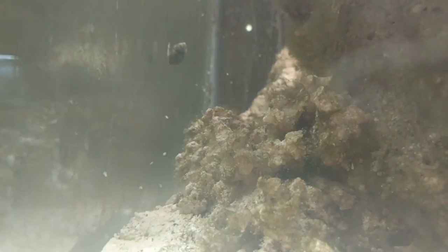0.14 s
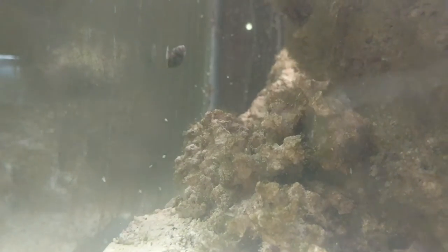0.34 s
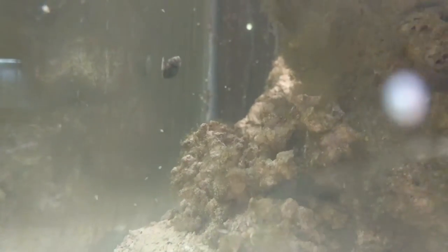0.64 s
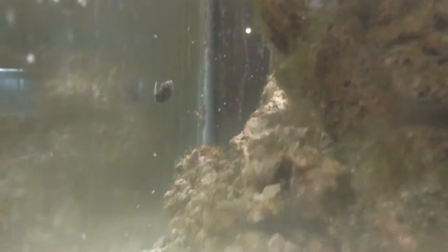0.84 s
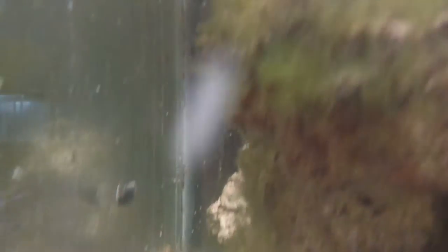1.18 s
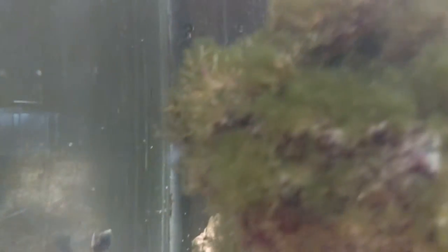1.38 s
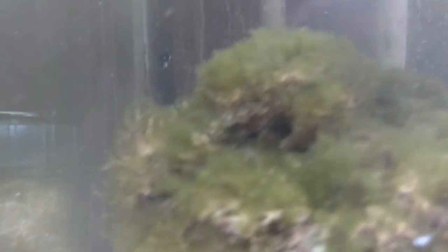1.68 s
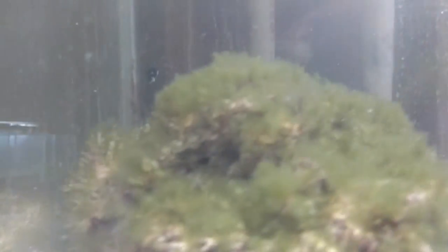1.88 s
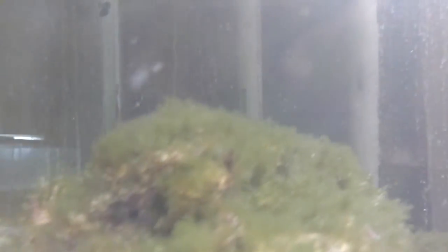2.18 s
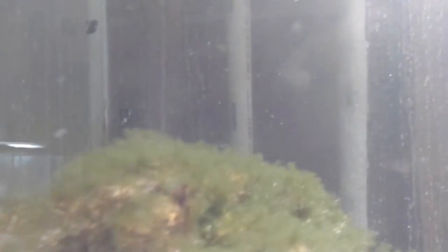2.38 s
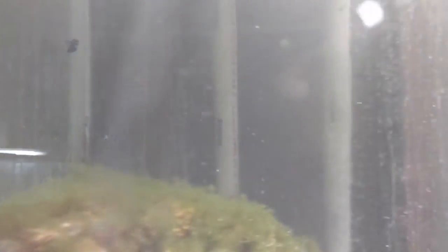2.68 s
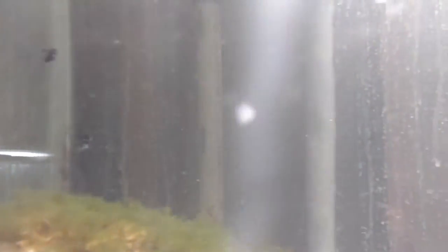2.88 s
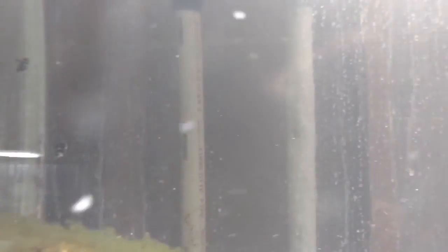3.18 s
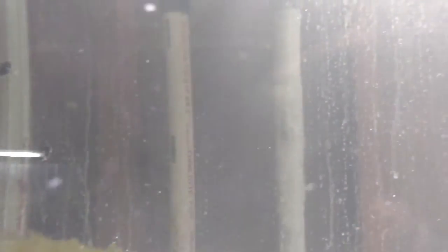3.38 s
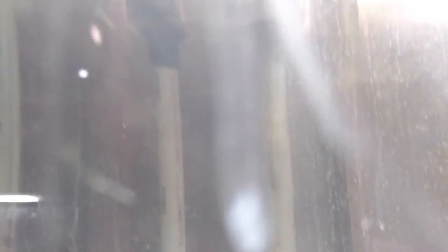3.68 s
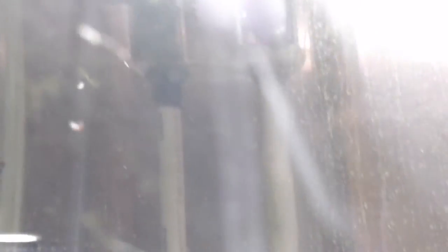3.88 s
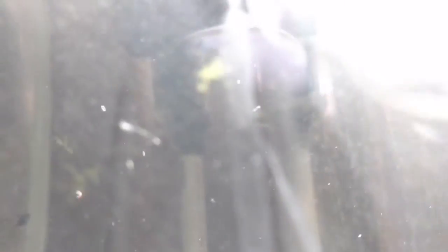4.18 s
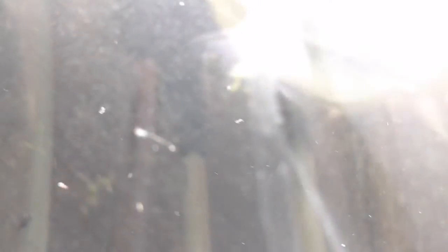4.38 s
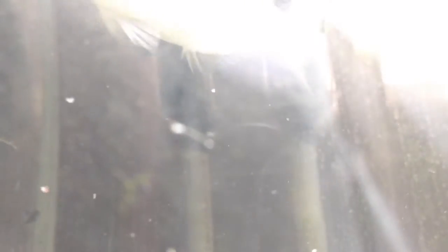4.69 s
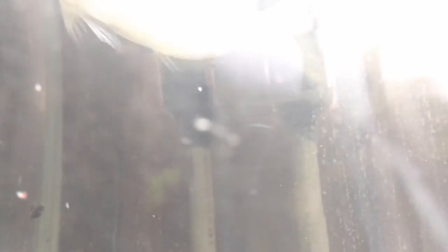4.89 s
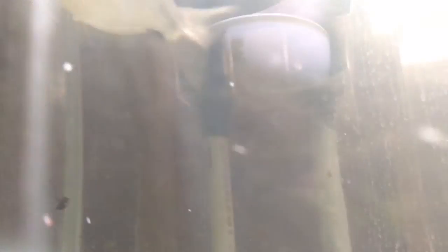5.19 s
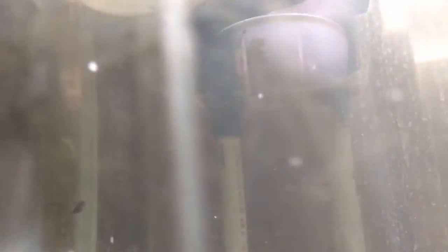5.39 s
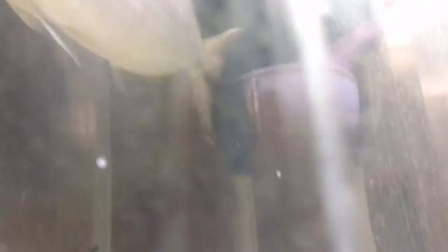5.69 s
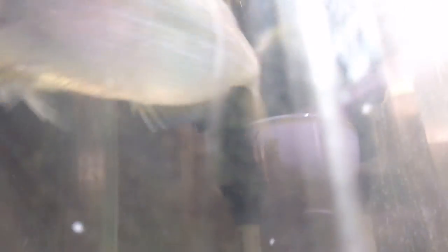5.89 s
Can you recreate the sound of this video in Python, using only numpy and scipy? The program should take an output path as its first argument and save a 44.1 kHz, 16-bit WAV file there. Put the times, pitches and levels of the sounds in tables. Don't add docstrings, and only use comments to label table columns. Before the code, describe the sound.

Water trickles, plinks and gurgles in a home aquarium, mostly to the right of a wide stereo image. A single loud glassy tap with a fast rattle of bounces comes early. Afterwards the microphone drifts up to the pump: its deep mains-like hum grows from almost nothing to dominant, overtones swelling and fading, the return pipe throbbing and whistling, the water thinning behind it.

```python
import sys
import numpy as np
from scipy import signal
from scipy.fft import rfft, irfft, next_fast_len
from scipy.io import wavfile
from scipy.ndimage import uniform_filter1d

SR = 44100
rng = np.random.default_rng(int(sys.argv[2]) if len(sys.argv) > 2 else 0)


def waveform_to_disk(signal):
    frames = np.transpose(np.atleast_2d(signal))
    scaled = np.clip(frames, -1, 1) * 32767
    samples = np.round(scaled).astype(np.int16)
    wavfile.write(sys.argv[1], SR, samples)


N = 266802

HUM_HZ = 120.0
# (time [s], level [dB])
HUM_APPROACH = [(0.0, -54), (0.9, -54.5), (1.25, -59.5), (1.5, -48.5), (1.8, -39.5), (2.1, -37),
                (2.4, -32.5), (2.7, -28.5), (3.0, -25.5), (3.17, -22.5), (3.3, -23.5), (3.45, -22),
                (3.7, -23), (4.1, -21), (4.35, -23.5), (4.5, -22), (5.1, -22), (6.05, -22)]
MULTIPLES = (2, 3, 4, 5, 6, 7, 8, 10, 11, 12, 15)
# (time [s], length [s], level [dB])
ROOM_SWELLS = [
    [(3.74, 0.68, -45), (4.7, .5, -44.5), (5.6, 1.6, -45)],
    [(0.43, 1.5, -48.5), (2.47, 1.04, -41.5), (3.46, 0.43, -44.5), (4.32, 0.66, -42), (4.85, 0.79, -45),
     (5.63, 1.8, -46)],
    [(1.5, 0.4, -50), (2.09, 0.43, -44.5), (2.91, 0.76, -46), (3.55, 0.46, -39.5), (3.85, .3, -42.5),
     (4.2, 0.42, -37.5), (5.06, 3.3, -42)],
    [(2.455, 0.7, -48), (3.3, 0.57, -47), (3.9, 1, -41), (5.26, 3.6, -44)],
]
# (time [s], length [s], level [dB])
CABINET_SWELLS = [
    [(1, 0.6, -65), (1.6, 0.8, -49), (2.1, 0.26, -44), (3, 0.4, -51), (4.5, 0.3, -49), (4.9, 0.7, -53)],
    [(0.15, 0.57, -47.5), (0.8, 0.62, -49), (5, 2, -52)],
    [(0.0, 0.8, -55), (1.5, 0.35, -56), (3, 0.32, -51), (5.7, 1.0, -53.5)],
    [(0.5, 1.7, -56), (3.5, 0.3, -57), (3.9, 0.35, -48.5), (4.2, 0.42, -46), (6, 1.5, -62)],
    [(0.4, 1, -56), (3.85, 0.27, -54), (4.3, 0.41, -54.5), (3.5, 0.6, -52), (5.5, 0.5, -59)],
    [(3.4, 0.79, -56), (3.9, 0.46, -56), (4.3, 0.61, -57)],
    [(3.85, 0.74, -54), (4.9, 0.8, -60)],
]
FOLLOWERS = ((9, 10), (13, 11))
FOLLOWER_DB, BETWEEN_SWELLS_DB = -8.5, -41

# (start [s], length [s], 2nd overtone level [dB], whistle level [dB], whistle pitch [Hz])
PIPE_THROBS = [(2.01, 0.19, -32, -44.5, 835), (2.26, 0.034, -40, -54, 840), (2.39, 0.065, -42, -60, 830),
               (2.497, .07, -43, -62, 800), (2.655, 0.13, -36.5, -39, 835), (2.87, 0.093, -35, -37, 840),
               (3.031, .11, -37.5, -40.5, 825), (3.154, 0.038, -55, -39.5, 880),
               (3.193, 0.053, -35, -38, 790), (3.312, .06, -41, -40.5, 850), (3.45, 0.047, -47, -41, 820),
               (3.562, 0.17, -42.5, -45, 850), (3.81, .15, -38, -42, 855), (3.985, 0.21, -39, -39.5, 843),
               (4.26, 0.091, -46, -46, 840), (4.44, 0.041, -43.5, -50, 830)]
THROB_RISE_S, THROB_FALL_S = 0.0353, 0.04
WHISTLE_LATE_S, WHISTLE_CLIMB_HZ_PER_S = 0.0203, 59.8

# (frequency [Hz], level [dB])
WASH_COLOUR = [(25, -11.5), (60, -19.5), (130, -3), (200, -3), (400, -4), (800, -3), (1100, -7.5),
               (1600, -9.5), (2200, -16.5), (4000, -21), (9000, -32.5)]
# (frequency [Hz], level [dB])
FIZZ_COLOUR = [(1200, -25), (2500, 8), (3500, 5), (5000, 7.5), (7000, 7), (9500, 1.5), (12000, -5),
               (15000, -7.5)]
# (frequency [Hz], width [Hz], level [dB])
OVERFLOW_PIPE = (345, 9, 5.5)
# (time [s], level [dB])
SPRAY_FACING = [(0.0, -54), (0.3, -58.5), (0.7, -57), (1.0, -52), (1.2, -54), (1.45, -49.5), (2.05, -48.5),
                (2.45, -53.5), (2.73, -49.5), (3.05, -57.5), (3.42, -54), (3.65, -61.5), (4.6, -66.5),
                (4.87, -65), (4.97, -56.5), (5.65, -59.5), (5.8, -64), (6.05, -65)]
# (time [s], level [dB], length [s])
SURGES = [(0.0, 1.5, 0.085), (0.368, 3.5, 0.085), (0.635, 1.5, .12), (1.004, 1.5, 0.24), (1.63, 5, 0.2),
          (2.056, 5, .15), (2.274, 2.5, .12), (2.62, 2.5, 0.18), (2.833, 2, 0.21), (3.153, 3.5, 0.23),
          (3.397, 2, 0.16), (4.01, 4, 0.23), (4.2, 3, 0.18), (5.307, 1, 0.64), (5.68, 2, .12)]
FIZZ_DB, FIZZ_SHARE, FIZZ_FADE_DB_PER_S = -47.5, 0.29, 0.88
WASH_FAR_DB, WASH_NEAR_DB, WASH_SHARE = -45, -43.5, 0.28
RUMBLE_HZ, RUMBLE_FAR_DB = 161, -7

# (time [s], pitch [Hz], level [dB], length [cycles])
CLEAR_DRIPS = [(.005, 5020, -34, 90), (.01, 3960, -50, 240), (.07, 3500, -48, 80), (.125, 4800, -33, 140),
               (.195, 4050, -43, 100), (.275, 4670, -37, 130), (0.321, 6300, -29, 100),
               (.62, 4280, -40, 70), (.75, 5600, -48, 150), (.83, 3260, -37, 66), (.96, 3390, -41, 120),
               (1.01, 2700, -53, 120), (0.069, 327, -44, 26), (0.279, 343, -31.5, 28),
               (0.549, 323, -35, 25), (1.52, 366, -36, 25), (3.17, 317.5, -29, 31), (3.22, 677, -34, 46),
               (5.19, 3630, -53, 37)]
# (time [s], peak level [dB], colour [Hz], top end [dB])
SPLASHES = [(0.047, -36, 9000, -15), (.235, -43, 9500, -6), (0.286, -39, 9000, -12),
            (0.468, -35, 7300, -12), (0.599, -33.5, 9000, -3), (.65, -42, 13000, 0), (.78, -41, 12000, 0),
            (1.035, -36, 9000, -12), (1.375, -35, 7000, -12), (1.555, -38, 9000, -16),
            (3.966, -43, 6000, -32)]

# (time [s], level [dB])
TAP_BLOWS = [
    (1.0736, -18),
    (1.075, -6.5),
    (1.0816, -16),
    (1.0873, -13.5),
    (1.0964, -17.5),
    (1.1043, -21),
]
# (frequency [Hz], level [dB], decay by 60 dB [s])
GLASS_MODES = [(344, -0.5, 0.23), (509, 1, .12), (608, -10, 0.11), (1240, -23, .08), (1610, 3, 0.056),
               (3040, -5, 0.082), (3210, 4.5, 0.19), (3040, 2, 0.086), (5100, -10, .1), (6000, 6.5, 0.072),
               (5800, 1, 0.12), (7000, -15, .05), (9200, 5, 0.062)]
# (frequency [Hz], level [dB])
CRACK_COLOUR = [(150, -16), (500, -11), (1000, 2.5), (1600, -3.5), (2200, -8), (3100, -3.5), (3900, -6),
                (4800, -5), (6000, -1.5), (9000, -2.5), (10500, -15), (15000, -10.5)]

# (frequency [Hz], level at the start [dB], level at the end [dB])
FAR_MOTOR = [(248.6, -45, -55), (535, -54, -61), (784, -55, -60.5), (1132, -56, -64)]

# (frequency [Hz], level [dB])
PORTS_APART = [(30, -29.5), (100, -6), (250, -5), (500, -3), (850, 0), (1200, 0.5), (15000, -0.5)]
# (frequency [Hz], level [dB])
BODY_SHADE = [(1000, 2), (3000, -3.5), (4500, -6), (7000, -7.5), (15000, -7)]
# (frequency [Hz], width [Hz], level [dB])
WEAK_BANDS = [
    [(2330, 500, -11.0)],
    [(1070, 160, -3.0), (3520, 300, -4.0)],
]
EDGE_HZ = 15500


def gain_of(db):
    return 10 ** (np.asarray(db) / 20)


def evened(x):
    return x / np.sqrt(np.mean(abs(x) ** 2) + 1e-20)


def read(points, hz):
    f, value = np.transpose(points)
    return np.interp(np.log(hz + 1), np.log(f + 1), value)


def level_at(rows, t):
    s, db = np.transpose(rows)
    return np.interp(t, s, db)


def bump(t, s, length):
    return np.exp(-(2 * (t - s) / length) ** 2)


def coloured(x, points):
    size = x.shape[-1]
    gain = gain_of(read(points, np.fft.rfftfreq(size, 1 / SR)))
    return irfft(rfft(x) * gain, size)


def tone(turns, hz, db, lag_s, waver, per_s=15.0):
    steps = rng.standard_normal(600)[:round(per_s * N / SR) + 2]
    drift = 1 + waver * np.interp(np.arange(N) / SR * per_s, np.arange(len(steps)), steps)
    turns = turns + rng.random() - np.array([[lag_s], [0]]) * hz
    return np.sqrt(2) * gain_of(db) * drift * np.cos(2 * np.pi * turns)


def at_ports(shared, own, hz):
    apart = np.minimum(gain_of(read(PORTS_APART, hz)), 1)[:, None]
    left = np.sqrt(1 - apart ** 2) * shared + apart * own
    return np.array([left * gain_of(read(BODY_SHADE, hz))[:, None], shared])


def placed(sound, s):
    hz, _, z = signal.stft(sound, SR, nperseg=64)
    pair = signal.istft(at_ports(z[0], z[1], hz), SR, nperseg=64)[1]
    out = np.zeros((2, N + pair.shape[1]))
    out[:, round(s * SR):][:, :pair.shape[1]] = pair
    return out[:, :N]


def overtones(t, hum_db):
    rest = gain_of(2 * (hum_db + BETWEEN_SWELLS_DB))
    level = {}
    for k, swells in zip(MULTIPLES, list(ROOM_SWELLS) + list(CABINET_SWELLS)):
        power = sum(gain_of(2 * db) * bump(t, s, length) ** 2 for s, length, db in swells)
        level[k] = 10 * np.log10(rest + power)
    for k, lead in FOLLOWERS:
        level[k] = level[lead] + FOLLOWER_DB
    return level


def throbs(t):
    start, length, second_db, whistle_db, hz = np.transpose(PIPE_THROBS)[:, :, None]

    def shape(late_s):
        rise = (t - start - late_s) / THROB_RISE_S + 0.5
        fall = (start + length - t) / THROB_FALL_S + 1
        return np.clip(np.minimum(rise, fall), 0, 1) ** 2

    second = gain_of(second_db) * shape(0)
    whistle = gain_of(whistle_db) * shape(WHISTLE_LATE_S)
    pitch = hz + WHISTLE_CLIMB_HZ_PER_S * (t - start - length / 2)
    rest = 1e-6
    pitch = ((whistle * pitch).sum(0) + rest * 7 * HUM_HZ) / (whistle.sum(0) + rest)
    return second.sum(0), whistle.sum(0), pitch


def pump():
    t, slow = np.arange(N) / SR, np.arange(0, N / SR + 0.01, 0.002)
    hum_db = level_at(HUM_APPROACH, slow)
    lines = {k: np.interp(t, slow, db) for k, db in overtones(slow, hum_db).items()}
    throb, whistle, whistle_hz = [np.interp(t, slow, course) for course in throbs(slow)]
    out = tone(HUM_HZ * t, HUM_HZ, np.interp(t, slow, hum_db), lag_s=70e-6, waver=0.072, per_s=5.06)
    second = np.hypot(throb, gain_of(lines.pop(2)))
    out += second * tone(2 * HUM_HZ * t, 2 * HUM_HZ, -1.1, lag_s=45e-6, waver=0.076)
    for k, db in lines.items():
        out += tone(k * HUM_HZ * t, k * HUM_HZ, db, lag_s=30e-6, waver=0.25, per_s=20.0)
    turns = np.cumsum(whistle_hz) / SR
    return out + whistle * tone(turns, whistle_hz, 0.087, lag_s=5e-6, waver=0.39, per_s=40.0)


def flow(t):
    spray_db, hum_db = level_at(SPRAY_FACING, t), level_at(HUM_APPROACH, t)
    near = (hum_db - hum_db.min()) / np.ptp(hum_db)
    surge_db = sum(db * bump(t, s, length) for s, db, length in SURGES)
    facing_db = FIZZ_SHARE * (spray_db - spray_db.mean())
    fizz_db = FIZZ_DB + facing_db - FIZZ_FADE_DB_PER_S * t + surge_db
    wash_db = WASH_FAR_DB + (WASH_NEAR_DB - WASH_FAR_DB) * near + WASH_SHARE * surge_db
    return fizz_db, wash_db, spray_db - fizz_db, RUMBLE_FAR_DB * (1 - near)


def water():
    frames, hz = N // 256 + 5, np.fft.rfftfreq(1024, 1 / SR)[:, None]
    fizz_db, wash_db, top_db, rumble_db = flow(np.arange(frames) * 256 / SR)
    a, b, c, d, patches = rng.standard_normal((frames, 513, 5)).T
    patches = evened(uniform_filter1d(uniform_filter1d(patches, size=12, axis=0), size=6, axis=1))
    flicker = evened(uniform_filter1d(rng.standard_normal(frames), size=4))
    pipe_hz, width_hz, pipe_db = OVERFLOW_PIPE
    pipe = pipe_db / (1 + (2 * (hz - pipe_hz) / width_hz) ** 2)
    rumble = rumble_db / (1 + (hz / RUMBLE_HZ) ** 4)
    wash = gain_of(read(WASH_COLOUR, hz) + pipe + wash_db - 4.0 + rumble)
    airy = np.clip(np.log2(hz / 6000 + 1e-3), 0, 1.2)
    fizz = gain_of(read(FIZZ_COLOUR, hz) + fizz_db - 21.0 + airy * (top_db + 9.0) + 0.53 * flicker)
    z = at_ports(a + 1j * b, c + 1j * d, hz[:, 0]) * np.hypot(wash, fizz) * gain_of(1.55 * patches)
    return signal.istft(z, nperseg=1024, noverlap=768)[1][:, :N]


def air_pocket(hz, cycles):
    t = np.arange(round(cycles * SR / hz)) / SR
    turns = hz * (t * (1 + 0.014 * t / t[-1]) - np.array([[60e-6], [0]]))
    shade = gain_of([[read(BODY_SHADE, hz)], [0]])
    return np.sin(2 * np.pi * turns) * np.hanning(len(t)) * shade


def bubbles(low_hz, high_hz, per_s, level_db, cycles):
    out = np.zeros((2, N))
    for hz in np.geomspace(low_hz, high_hz, num=12):
        size = gain_of(2.6 * np.minimum(rng.exponential(1, N), 1.8))
        births = size * (rng.random(N) < per_s / 12 / SR)
        out += signal.oaconvolve(births[None], air_pocket(hz, cycles), axes=1)[:, :N]
    return gain_of(level_db) * out


def drips():
    out = np.zeros((2, N))
    for s, hz, db, cycles in CLEAR_DRIPS:
        for late, size in rng.uniform(-1, 1, (3, 2)):
            ring = gain_of(db - 5.5) * air_pocket(hz * (1 + 0.018 * size), 0.65 * cycles)
            start = round((s + (1 + late) * 0.15 * cycles / hz) * SR)
            out[:, start:][:, :ring.shape[1]] += ring
    return out


def splashes():
    t, out = np.arange(3000) / SR, np.zeros((2, N))
    for s, db, hz, top_db in SPLASHES:
        colour = [(0.36 * hz, -30), (0.5 * hz, -6), (hz, 0), (1.3 * hz, -5), (16000, top_db)]
        hiss = evened(coloured(rng.standard_normal((2, len(t))), colour))
        out += placed(gain_of(db - 60 * t / 0.17) * hiss * np.minimum(t / 0.0011, 1), s)
    return out


def tap():
    t, blows = np.arange(9000) / SR, np.zeros(9000)
    first_s = TAP_BLOWS[0][0]
    for s, db in TAP_BLOWS:
        blows[round((s - first_s) * SR)] = gain_of(db)
    ring = 0
    for hz, db, t60 in GLASS_MODES:
        ring = ring + gain_of(db - 60 * t / min(t60, 0.2)) * np.sin(2 * np.pi * hz * t)
    crack = evened(coloured(rng.standard_normal((2, len(t))), CRACK_COLOUR))
    crack = crack * (gain_of(-60 * t / 0.012) + gain_of(-10.5 - 60 * t / 0.15))
    body = gain_of(-5.5) * ring / abs(ring).max() + gain_of(-3.5) * crack
    return placed(signal.fftconvolve(blows[None], body, axes=1)[:, :len(t)], first_s)


def far_motor():
    t, out = np.arange(N) / SR, np.zeros((2, N))
    for hz, start_db, end_db in FAR_MOTOR:
        out += tone(hz * t, hz, start_db + (end_db - start_db) * t / t[-1], lag_s=90e-6, waver=0.29)
    return out


def scene():
    gurgle = bubbles(low_hz=273.0, high_hz=1496, per_s=13, level_db=-58.0, cycles=17)
    trickle = bubbles(low_hz=2605, high_hz=8170, per_s=60, level_db=-58, cycles=75)
    return pump() + water() + gurgle + trickle + drips() + splashes() + tap() + far_motor()


def low_pass(x):
    return signal.sosfilt(signal.butter(12, 15500, fs=SR, output="sos"), x)


def record(dry):
    size = next_fast_len(N + 2048)
    hz = np.fft.rfftfreq(size, 1 / SR)
    s = 1j * hz / 3900
    cross = 0.92 * np.exp(-2j * np.pi * hz * 338e-6) / ((1 + s) * (1 + s + s ** 2))
    lift = 1 / np.interp(np.clip(hz, 110, 800), hz, abs(1 - cross))
    band = lift * np.clip((EDGE_HZ + 200 - hz) / 900, 0, 1)
    centre_gain, sides_gain = [
        gain_of(sum(db * np.exp(-((hz - f) / (width / 2)) ** 4) for f, width, db in bands))
        for bands in WEAK_BANDS]
    left, right = rfft(dry, size)
    centre = (left + right) * (1 - cross) * centre_gain * band / 2
    sides = (left - right) * (1 + cross) * sides_gain * band / 2
    wide = irfft(np.array([centre + sides, centre - sides]), size)[:, :N]
    return low_pass(wide)


dry = scene()
out = record(dry)
waveform_to_disk(out)
```